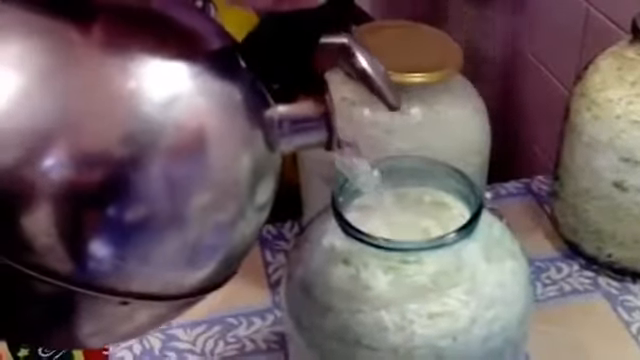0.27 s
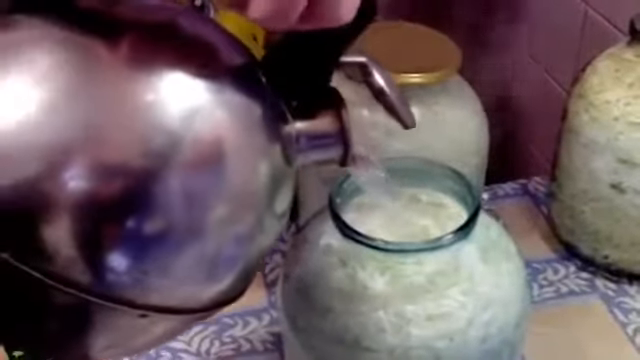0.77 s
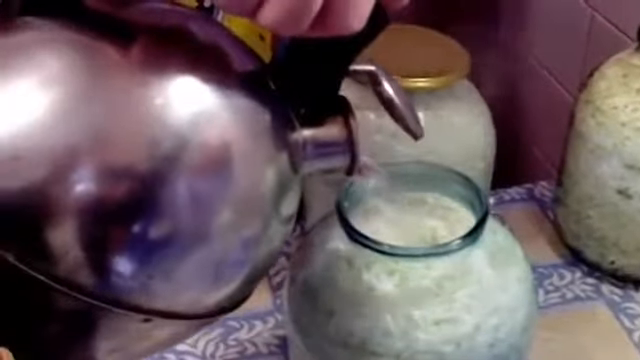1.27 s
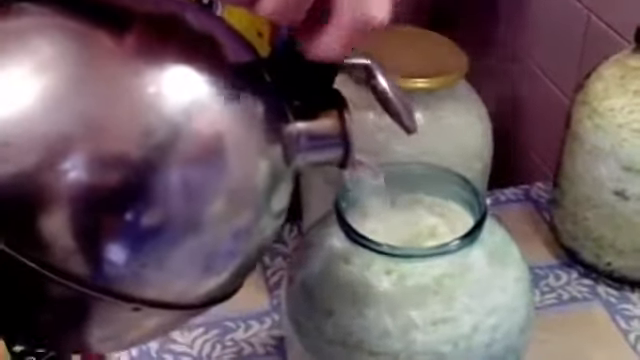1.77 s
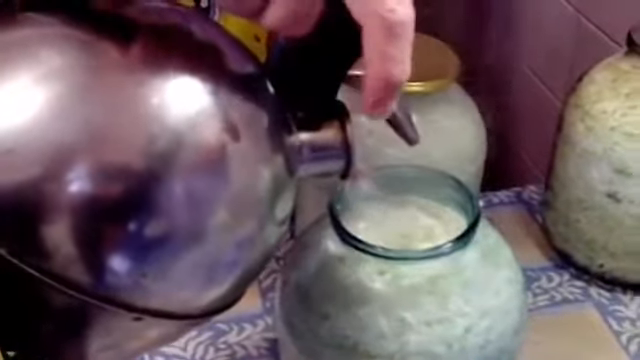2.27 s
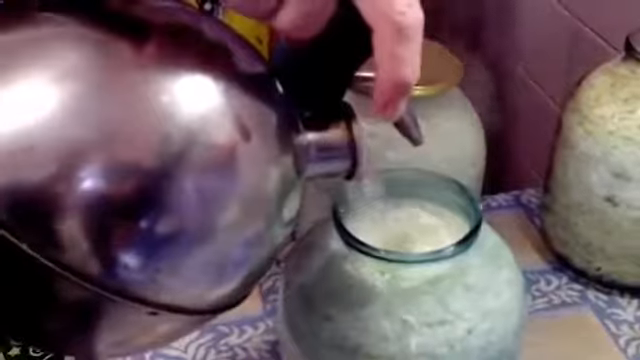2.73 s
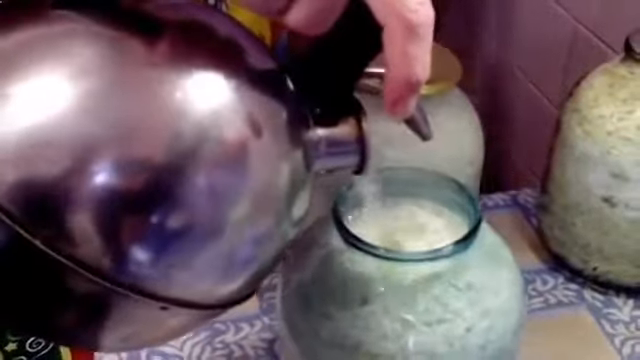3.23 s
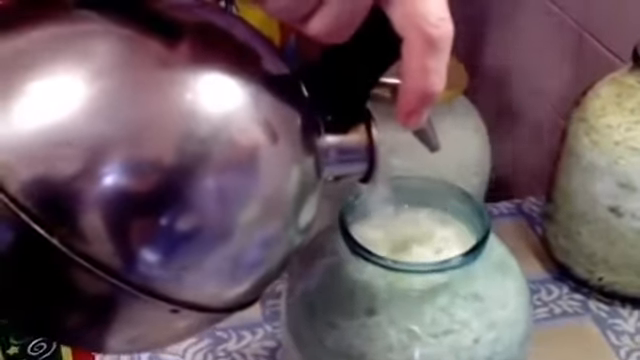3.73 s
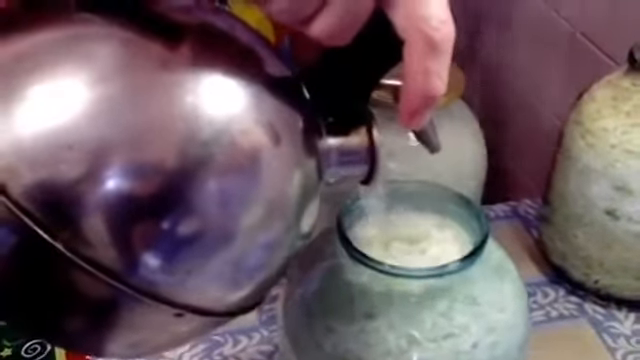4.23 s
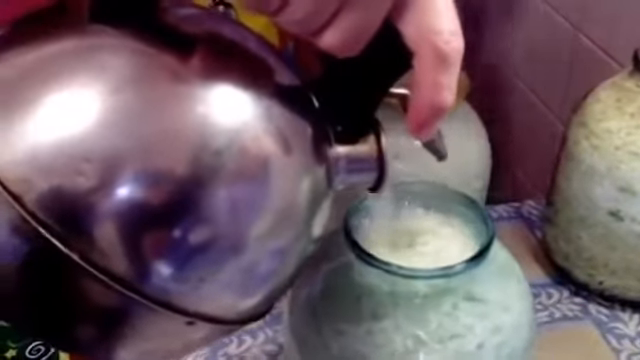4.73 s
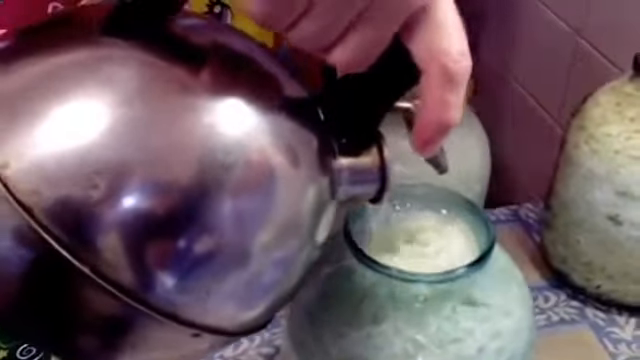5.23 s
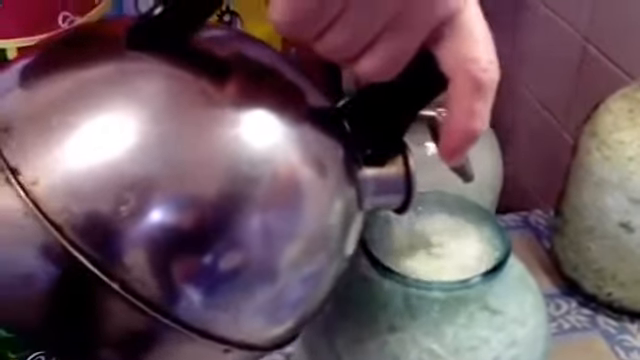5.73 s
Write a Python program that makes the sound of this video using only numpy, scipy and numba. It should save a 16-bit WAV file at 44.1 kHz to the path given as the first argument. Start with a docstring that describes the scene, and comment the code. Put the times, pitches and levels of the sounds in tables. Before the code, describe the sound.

Hot water pours from a kettle into a glass jar stuffed with shredded vegetables, heard very close in a small tiled kitchen. From the start there is a continuous, uneven burble of short bubble tones around 1 kHz, with fine froth crackle and soft low drumming. By 1.7 s the gurgle has climbed to about 1.5 kHz; clear plops and higher glassy blips stand out, with a sharp snap near 1.76 s. From 2 to 4.5 s it is densest: quick surges, tiny interruptions, wet slaps around 3.2-3.35 s, and a deep gulp near 3.9 s. After 4.5 s the stream thins into separate plops, a strong one at 4.67 s, over a growing but faint hiss. A last bright snapping plop with a brief sinking ring comes at 5.88 s. The stereo image leans and flickers, echoes are short, treble is muffled, and gaps sound slightly hollow from noise suppression.

```python
"""Gurgling, plopping and crackling: hot water runs from a kettle into a glass jar of shredded vegetables.
A phone with two microphone ports is close by in a small tiled kitchen, the jar towards its right.
Bubbles are short swelling tones, in random swarms or placed singly; splashes and fine spray are shaped noise.
The jar's air rings as narrow resonances, and decaying noise tails are the tiled walls.
Towards the end the stream thins to separate plops over a quiet hiss."""
import sys
import numpy as np
from scipy import signal
from scipy.fft import rfft, irfft, next_fast_len
from scipy.io import wavfile
from scipy.ndimage import uniform_filter1d
from numba import njit

SR = 44100
rng = np.random.default_rng(int(sys.argv[2]) if len(sys.argv) > 2 else 0)


def to_wav(s):
    """Save 16-bit WAV."""
    ch = np.atleast_2d(s).T  # columns
    pcm = np.round(np.clip(ch, -1, 1) * 32767)  # PCM
    wavfile.write(sys.argv[1], SR, pcm.astype(np.int16))


N = 264548
TIME = np.arange(N) / SR  # seconds
# In every table level_db is relative: later gains, colours and the room still act on it.


def undb(db):
    """Decibels to gain."""
    return 10 ** (np.asarray(db) / 20)


def curve(table, column):
    """One column of a table of (start_s, ..) rows, interpolated at every sample."""
    rows = np.array(table, float)
    return np.interp(TIME, rows[:, 0], rows[:, column])


def shape(points, hz):
    """Gain of (freq_hz, level_db) points on a log-frequency axis."""
    point_hz, level_db = np.transpose(points)
    return undb(np.interp(np.log(hz + 1), np.log(point_hz), level_db))


def filtered(x, response):
    """Pass x through a response given as a function of frequency."""
    size = next_fast_len(N + SR // 4)
    hz = np.arange(size // 2 + 1) * SR / size
    return irfft(rfft(x, size) * response(hz), size)[..., :N]


def colour(x, points):
    """Filter x by a curve of (freq_hz, level_db) points."""
    return filtered(x, lambda hz: shape(points, hz))


def ring(x, modes):
    """Sum of narrow resonances, each excited by x."""
    total = 0
    for hz, width_hz, level_db in modes:
        b, a = signal.iirpeak(hz, hz / width_hz, fs=SR)
        total = total + undb(level_db) * signal.lfilter(b, a, x)
    return total


def steady(x, window_s):
    """Even out the rms over a window, so that single grains still stand out."""
    size = int(window_s * SR)
    power = uniform_filter1d(uniform_filter1d(x ** 2, size), size)
    floor = np.mean(x ** 2) / 100
    return x / np.sqrt(np.abs(power) + floor)


def wander(rate):
    """A random line through unit-spread knots, rate of them a second."""
    knots = np.arange(0, N / SR + 1, 1 / rate)
    return np.interp(TIME, knots, rng.standard_normal(4096)[:len(knots)])


def swells(rows, column, edge_s, arch):
    """Gain that rises and falls in one arch per (start_s, length_s, ..) row, widened by edge_s at both ends."""
    gain = np.zeros(N)
    for row in rows:
        u = (TIME - row[0] + edge_s) / (row[1] + 2 * edge_s)
        inside = (u > 0) & (u < 1)
        gain[inside] += undb(row[column]) * np.sin(np.pi * u[inside]) ** arch  # higher arch: more pointed
    return gain


def bursts(rows):
    """Noise that starts at once and dies away, for rows of (start_s, level_db, decay_ms)."""
    envelope = np.zeros(N)
    for start, db, decay_ms in rows:
        span = slice(int(start * SR), int(start * SR) + SR // 8)
        envelope[span] += undb(db) * np.exp(-1000 * (TIME[span] - start) / decay_ms)
    return envelope * rng.standard_normal(N)


@njit
def tones(start, hz, size, swell, soft, glide):
    """Tones that swell and die away while their pitch creeps; low softness means quick attack and longer tail."""
    out = np.zeros(N)
    for k in range(len(start)):
        first, phase = int(start[k] * SR), 0.
        for i in range(max(0, -first), min(int(8 * swell[k] * SR), N - first)):
            u = i / (swell[k] * SR)  # age in swell times
            v = u / np.sqrt(soft[k] / 2)
            phase += 2 * np.pi * hz[k] * (1 + glide * (u - 1)) / SR
            out[first + i] += size[k] * (v * np.exp(1 - v)) ** soft[k] * np.sin(phase)
    return out


# attack of a bubble by its pitch, quickest near the jar's upper resonance: pitch_hz, softness [exponent]
ATTACK_SOFTNESS = [(1800, 2.08), (2250, 0.29), (2700, 1.1), (3400, 2)]


def bubbles(start, hz, size, swell, glide):
    """Each bubble is one short tone, its attack set by its pitch; glide is its pitch change per swell time."""
    soft = np.maximum(np.interp(hz, *np.transpose(ATTACK_SOFTNESS)), .1)
    return tones(start, hz, size, swell, soft, glide)


CLUSTER_S, CLUSTER_SPREAD = .003, 0.099  # bubbles born together: mean delay, pitch scatter (share)


def swarm(pitch, spread, cycles, scatter_db, glide, count, size=1):
    """Random clusters of like bubbles around a pitch curve: many faint ones and a few strong ones."""
    when, wide, strength = np.repeat(rng.random((count, 3)), size, axis=0).T  # shared by a cluster
    late, life, detune = rng.random((count * size, 3)).T
    start = when * N / SR - CLUSTER_S * np.log(1 - late)
    hz = np.interp(start, TIME, pitch) * np.exp(spread * np.log((wide + .01) / (1.01 - wide)))
    hz = np.minimum(hz * np.exp(CLUSTER_SPREAD * (2 * detune - 1)), SR / 3)
    loudness = undb(-scatter_db * np.log(1 - strength))
    return bubbles(start, hz, loudness, cycles * (.5 + life) / hz, glide)


# resonances of the air in the jar: freq_hz, width_hz, level_db
JAR_MODES = [(700, 180, -2.5), (943, 27, 12), (1260, 82, 6.5), (1338, 50, -1.5), (1400, 31, 8.5),
             (1647, 14, 5.5), (1832, 24, 13), (1884, 92, 6), (2270, 290, 7), (2442, 120, 9),
             (3136, 110, 11), (4420, 530, 7)]


def in_jar(x, ring_db):
    """Sound from the surface, direct and rung by the air in the jar."""
    return x + undb(ring_db) * ring(x, JAR_MODES)


BEADS_FULL_DB, BEADS_THIN_DB = 0.36, 7  # unevenness of the stream at the start and at the end


def beading(rate):
    """The falling stream breaks into beads, more so as it thins, so what it stirs up comes in quick clumps."""
    return undb(np.linspace(BEADS_FULL_DB, BEADS_THIN_DB, N) * wander(rate))


# moments when the stream breaks: start_s, length_s, depth [0-1]
STREAM_LULLS = [(1.26, 0.083, 1), (2.035, 0.041, 0.76), (2.298, 0.029, 0.78), (2.482, 0.2, 0.35),
                (2.761, 0.091, 0.64), (2.924, 0.067, 0.87), (3.04, 0.11, 0.22), (3.314, 0.051, 1),
                (3.62, 0.09, 0.65), (4.102, 0.034, 0.75), (4.243, 0.067, 0.42), (5.06, 0.12, 0.2)]


def unbroken():
    """Share of the even stream that still lands: 1, sinking in each lull."""
    share = np.ones(N)
    for start, length, depth in STREAM_LULLS:
        lull = np.interp((TIME - start) / length, [0, .25, .75, 1], [0, 1, 1, 0])
        share *= 1 - np.clip(depth, 0, 1) * lull
    return share


# the stream wobbles and plunges deeper:
# start_s, length_s (before widening), drumming_level_db, gurgle_level_db, small_bubbles_level_db
STREAM_SURGES = [(.117, 0.03, -52, -38.5, -52), (.25, 0.018, -54.5, -38, -51.5),
                 (.603, 0.037, -53, -36.5, -45), (.799, 0.072, -45, -40.5, -79),
                 (1.05, 0.023, -44, -35, -48), (1.147, 0.052, -51, -37.5, -49.5),
                 (1.24, 0.081, -46, -41.5, -53.5), (1.473, 0.04, -46.5, -52, -49.5),
                 (1.786, 0.1, -46, -36.5, -64), (2.07, 0.23, -42, -40, -50),
                 (2.346, 0.15, -51, -37.5, -48.5), (2.816, 0.045, -43.5, -62, -45.5),
                 (2.89, 0.046, -74, -37.5, -44), (3.01, 0.021, -50, -53, -63),
                 (3.152, 0.044, -41, -50.5, -53), (3.205, 0.12, -40.5, -34, -45),
                 (3.378, 0.053, -43.5, -52.5, -62), (3.529, 0.07, -42.5, -37, -62),
                 (3.71, 0.1, -48.5, -48.5, -43), (3.915, 0.1, -40, -39, -48),
                 (4.19, 0.055, -53, -51, -41.5), (4.35, 0.045, -52.5, -32.5, -41),
                 (4.944, 0.1, -44, -47, -57.5)]
SWAY_PER_S, SWAY_DB = 17, 4.5  # the even stream is never quite even


def stream(even, column, even_db, surge_db):
    """Strength of one voice of the stream: its swaying even part (dB curve) with the surges on top."""
    surge = swells(STREAM_SURGES, column, edge_s=0.012, arch=0.44)
    steady_part = undb(even + even_db + SWAY_DB * wander(SWAY_PER_S)) * unbroken()
    return np.hypot(steady_part, undb(surge_db) * surge)


# the even stream, thinning towards the end: start_s, gurgle_level_db, small_bubbles_level_db, spray_level_db
EVEN_FLOW = [(0.0, -40.5, -50, -51), (0.1, -47.5, -70.5, -57.5), (0.53, -42.5, -54.5, -59.5),
             (0.89, -52, -58.5, -55), (1.1, -45, -53, -49.5), (1.47, -45.5, -60, -60),
             (2.02, -42.5, -48, -53.5), (2.22, -53.5, -53, -58), (2.62, -42.5, -59.5, -54.5),
             (3.11, -48.5, -51, -54), (3.39, -44, -46.5, -55.5), (4.38, -49, -57, -58),
             (5.66, -59, -57.5, -59), (6.0, -70, -77, -63)]
# typical pitch of the gurgle as the pool deepens: start_s, pitch_hz
GURGLE_PITCH_CURVE = [(0, 1036), (.9, 1087), (1.7, 1524), (2.6, 1518), (3.3, 1340), (4.2, 1616), (6, 1566)]
# spectrum of the gurgle: freq_hz, level_db
GURGLE_SPECTRUM = [(200, -37.5), (480, -25), (680, -10), (1000, 6), (1750, 12), (2000, -5.5), (2600, -16),
                   (3200, -53.5)]


def gurgle(beads):
    """The stream folds air into the pool as a burble of middling bubbles; a few ring on as clear, rising blips."""
    pitch = curve(GURGLE_PITCH_CURVE, column=1)
    burble = swarm(pitch, spread=0.1847, cycles=2.5, scatter_db=2.43, glide=0.018, count=3800)
    blips = swarm(pitch, spread=.11, cycles=7, scatter_db=1.2, glide=.015, count=600)
    burble = burble / np.std(burble) + undb(-3) * blips / np.std(blips)
    burble = in_jar(burble * beads, ring_db=0.5)
    strength = stream(curve(EVEN_FLOW, column=1), column=3, even_db=3.5, surge_db=-3.0)
    return steady(colour(burble, GURGLE_SPECTRUM), window_s=0.17) * strength


# spectrum of the low bubbles: freq_hz, level_db
GLUG_SPECTRUM = [(350, -14.5), (520, 0.5), (660, 11), (1200, -26.5)]


def glug(beads):
    """The stream frees large, low bubbles, most of all when a surge digs deep."""
    large = swarm(np.full(N, 780.), spread=0.073, cycles=3.2, scatter_db=4, glide=0.0072, count=2500)
    strength = stream(curve(EVEN_FLOW, column=1), column=2, even_db=-13.0, surge_db=-5.5)
    return steady(colour(large * beads, GLUG_SPECTRUM), window_s=0.15) * strength


def tinkle(beads):
    """Smaller bubbles ring higher."""
    small = swarm(np.full(N, 2450.), spread=.08, cycles=2.2, scatter_db=2.6, glide=.01, count=4000)
    small = in_jar(small * beads, ring_db=0)
    strength = stream(curve(EVEN_FLOW, column=2), column=4, even_db=3.5, surge_db=1.0)
    return steady(small, window_s=1.0) * strength


# spectrum of the fine droplets: freq_hz, level_db
FIZZ_SPECTRUM = [(1500, -20), (3000, 1), (4000, 1.5), (6500, -4), (8000, -31.5)]


def fizz(beads):
    """Countless tiny droplets thrown up with the small bubbles: a fine hiss from all over the jar's mouth."""
    mist = colour(rng.standard_normal((2, N)) * np.sqrt(beads), FIZZ_SPECTRUM)
    strength = stream(curve(EVEN_FLOW, column=2), column=4, even_db=-5.5, surge_db=-7.5)
    return mist / np.std(mist) * strength


# patches of froth bursting: start_s, length_s (before widening), level_db, pitch_hz
FROTH_PATCHES = [(0, 0.0075, -40.5, 5360), (0.125, 0.032, -47, 3464), (0.232, 0.043, -47, 4275),
                 (0.324, 0.05, -45, 4890), (0.393, 0.04, -43.5, 4170), (0.572, 0.041, -49, 4560),
                 (0.68, 0.059, -53.5, 5040), (0.916, 0.067, -48.5, 4620), (1.043, 0.0077, -41, 5770),
                 (1.14, 0.059, -48, 4790), (1.372, 0.041, -45, 5030), (1.485, 0.094, -46.5, 5150),
                 (1.729, 0.025, -43.5, 5130), (1.898, 0.061, -48, 4980), (2.071, 0.074, -56, 4060),
                 (2.16, 0.047, -42, 6360), (2.27, 0.016, -51.5, 3880), (2.446, 0.069, -38.5, 4650),
                 (2.811, 0.11, -53, 4970), (3.028, 0.054, -48, 4690), (3.286, 0.013, -46, 4550),
                 (3.39, 0.034, -44.5, 4290), (3.561, 0.11, -47.5, 4850), (3.756, 0.017, -46, 3530),
                 (3.902, 0.11, -53, 3705), (4.361, 0.021, -42.5, 5850), (4.525, 0.041, -49, 4426)]
# spectrum of the spray: freq_hz, level_db
SPRAY_SPECTRUM = [(1500, -14.5), (2800, -61), (3250, 2.5), (4500, -4.5), (6200, 5), (6900, 2), (7500, -7.5),
                  (8200, -30), (12000, -26.5)]


def spray(beads):
    """Froth bursts in patches, each made of small clusters of tiny bubbles of a like size."""
    s, length, _, hz = np.array(FROTH_PATCHES, float).T
    patch_hz = np.interp(TIME, s + length / 2, hz) * np.exp(.08 * wander(rate=30))
    crackle = swarm(patch_hz, spread=.13, cycles=5.5, scatter_db=3, glide=.004, count=3000, size=4)
    crackle = colour(in_jar(crackle * beads, ring_db=-11.0), SPRAY_SPECTRUM)
    crackle = steady(crackle, window_s=.06)
    patches = swells(FROTH_PATCHES, column=2, edge_s=0.0078, arch=0.071)
    even = undb(curve(EVEN_FLOW, column=3) + 4.5) * unbroken()
    return crackle * np.hypot(even, patches)


# low resonances of the filled jar on the table: freq_hz, width_hz, level_db
BODY_MODES = [(128.5, 13, 15.5), (155.1, 32, 9.5), (180, 24, -4.5), (314, 27, 4.5)]
# spectrum of the drumming: freq_hz, level_db
THRUM_SPECTRUM = [(30, -26.5), (65, -14), (105, -1.5), (210, 9), (320, 8), (450, -12.5), (900, -44.5)]


def drumming():
    """The weight of the stream pats the soaked packing and shakes the jar."""
    pats = swarm(np.full(N, 170.), spread=.35, cycles=.35, scatter_db=1.5, glide=.02, count=2000)
    thrum = steady(colour(ring(pats, BODY_MODES), THRUM_SPECTRUM), window_s=.06)
    return thrum * stream(curve(EVEN_FLOW, column=1), column=2, even_db=-13.0, surge_db=0.34)


# spectrum of the room noise: freq_hz, level_db
HISS_SPECTRUM = [(25, -40.5), (60, -15.5), (130, 14), (200, 3.5), (340, 9.5), (550, 2), (1200, -20),
                 (2500, -17), (3800, -18), (5000, -15), (6800, -19.5), (7500, -27), (7850, -58.5),
                 (15000, -72)]
# level of the room's hiss above the murmur: start_s, level_db
HISS_LEVEL = [(0, -38.5), (2, -65), (3.9, -53), (4.4, -46), (5.2, -41), (6, -40.5)]
MURMUR_DB = -54.5  # gain of the low part, which stays even


def hiss():
    """Quiet room noise, partly shared by the ports: an even low murmur, and a hiss that sinks and grows again."""
    mid, side = colour(rng.standard_normal((2, N)), HISS_SPECTRUM)
    side = colour(side, [(120, -3.0), (400, -3.0), (1200, -2.5)])
    pair = np.array([mid + side, mid - side])
    pair = pair / np.std(pair)
    low = colour(pair, [(200, 0), (330, -3), (700, -3), (1600, -30)])
    return low * undb(MURMUR_DB) + (pair - low) * undb(curve(HISS_LEVEL, column=1))


SHED_DB, SHED_S, SHED_SPREAD = -12, 0.018, 0.18  # highest level against the parent, time window, pitch scatter
SHED_CYCLES = 2.5  # cycles in which a shed bubble swells


def shed(s, hz, db, count):
    """Each big bubble is followed by a few weaker ones of about its size."""
    late, wide, weak = rng.random((len(s), 3, count)).transpose(1, 2, 0)
    pitch = (hz * np.exp(SHED_SPREAD * (2 * wide - 1))).ravel()
    start = (s + SHED_S * late).ravel()
    return bubbles(start, pitch, (undb(db + SHED_DB) * weak).ravel(), SHED_CYCLES / pitch, 0.0099)


# big bubbles: start_s, level_db, pitch_hz, swell [cycles]
BIG_BUBBLES = [(0.1542, -35, 1060, 2.6), (0.346, -33, 1126, 1.5), (0.388, -26, 1140, 1.5),
               (0.433, -24.5, 1060, 1.2), (0.4579, -23.5, 1036, 0.69), (0.506, -40, 1270, 0.31),
               (0.5718, -34.5, 1140, 2.8), (0.618, -20, 1170, 1.2), (0.688, -24.5, 1360, 1.2),
               (0.715, -25, 1324, 1.6), (0.7332, -31, 1290, 2.8), (.852, -32.5, 1330, 3.3),
               (0.894, -29.5, 1290, 1.3), (1.005, -31.5, 1255, 3.2), (1.182, -30, 1530, 1.5),
               (1.251, -25.5, 2420, 3), (1.265, -26, 1310, 0.77), (1.4773, -33.5, 1490, 1.7),
               (1.532, -32.5, 1433, 6.9), (1.74, -24.5, 1390, 1.1), (1.7812, -23, 1410, 1.3),
               (1.822, -24, 1474, 1.9), (1.97, -18.5, 1445, 2), (1.9757, -21.5, 1700, 3),
               (2.0933, -26, 2370, 3.6), (2.113, -25, 2400, 3), (2.1454, -26.5, 1690, 2.1),
               (2.164, -22, 1540, 1.4), (2.236, -18, 1485, 1.7), (2.26, -31, 1645, 3.5),
               (2.3476, -26.5, 1304, 3), (2.3629, -17, 1540, 1.2), (2.578, -30.5, 1600, 3.8),
               (2.686, -26.5, 1550, 2.3), (2.7565, -21.5, 1640, 3.1), (2.864, -27.5, 1790, 2.2),
               (2.902, -21, 1595, 1.4), (2.9388, -24.5, 1635, 2.6), (3.0229, -27.5, 1660, 0.83),
               (3.229, -18, 1580, 0.83), (3.265, -25, 1290, 1.6), (3.262, -23.5, 2430, 2.3),
               (3.323, -17.5, 1323, 1.3), (3.332, -19, 1690, 2.8), (3.2875, -25, 1320, 1.3),
               (3.342, -26, 1640, 3.3), (3.391, -26, 1710, 3.9), (3.406, -25, 1724, 3.8),
               (3.4875, -29.5, 2410, 5.8), (3.4937, -25, 1575, 1.8), (3.602, -27, 1590, 2),
               (3.7297, -23.5, 1167, 0.39), (3.739, -24.5, 1520, 1), (3.777, -32.5, 2460, 4.3),
               (3.798, -31, 1670, 2), (3.912, -18.5, 2190, 0.96), (3.937, -20.5, 1740, 1.9),
               (3.9545, -23, 1750, 1.1), (4.0788, -20.5, 2380, 2.9), (4.155, -31, 2320, 3.9),
               (4.1877, -39, 2450, 1.6), (4.2215, -24, 2240, 1.5), (4.2386, -28.5, 2305, 3.1),
               (4.356, -31, 1600, 1), (4.377, -21, 2320, 3.2), (4.383, -19.5, 1345, 1.5),
               (4.4958, -22, 2376, 2.6), (4.6205, -26, 2970, 0.33), (4.731, -39, 1280, 0.61),
               (4.7713, -41, 2380, 1.9), (4.5296, -19, 2525, 1.8), (4.5619, -25.5, 2320, 3.9),
               (4.667, -15.5, 1458, 2.9), (4.758, -23.5, 2560, 0.61), (4.805, -32, 1770, 4.7),
               (4.859, -33.5, 2400, 2), (4.896, -36, 1230, 2.5), (5.009, -25.5, 1720, 1.3),
               (5.014, -24.5, 2490, 4.4), (5.0226, -22, 2270, 1.2), (5.172, -31, 1650, 3.2),
               (5.2861, -30.5, 1220, 1.2), (5.2917, -29, 1186, 2), (5.4627, -25.5, 2430, 3.1),
               (5.4748, -28, 2340, 1.1), (5.4895, -27.5, 2930, 1.8), (5.75, -29, 1270, 1.7),
               (5.8763, -19.5, 1468, 2.9)]
PLOP_DB = 3.5  # gain of all big bubbles


def plops():
    """Big single bubbles, each with a weaker bounce off the glass and a ring of the jar."""
    s, db, hz, cycles = np.array(BIG_BUBBLES, float).T
    direct = bubbles(s, hz, undb(db + PLOP_DB), cycles / hz, 0.012)
    bounce = np.interp(TIME - .0058, TIME, direct)  # 5.8 ms later
    smaller = shed(s, hz, db + PLOP_DB, count=4)
    return direct + smaller + undb(-23.5) * bounce + undb(-20) * ring(bounce, JAR_MODES)


# large air pockets gulping in the packing: start_s, pitch_hz, level_db, swell_ms
AIR_POCKETS = [(0.256, 168, -41, 12), (0.627, 126, -40, 24), (0.811, 156, -39.5, 12.4),
               (1.271, 164, -39.5, 37), (2.092, 186.8, -34.5, 44), (2.828, 177, -43.5, 7.9),
               (3.156, 186, -37, 6.6), (3.928, 131, -32, 22), (5.006, 123, -42.5, 30),
               (5.925, 655, -49.5, 63)]


def gulps():
    """Air pockets between the shreds give way with a low, unsteady boom."""
    s, hz, db, swell_ms = np.array(AIR_POCKETS, float).T
    return bubbles(s, hz, undb(db), swell_ms / 1000, 0.0077) * undb(1.1 * wander(rate=10))


SPLIT_S, SPLIT_SPREAD = 0.0032, 0.48  # tiny bubbles of one drop: time window, pitch scatter (share)


def splinters(s, hz, db, count):
    """A drop breaks into a handful of tiny bubbles within a few milliseconds."""
    late, wide = rng.random((len(s), 2, count)).transpose(1, 2, 0)
    pitch = (hz * np.exp(SPLIT_SPREAD * (2 * wide - 1))).ravel()
    return bubbles((s + SPLIT_S * late).ravel(), pitch, np.tile(undb(db), count), 2.5 / pitch, .02)


# drops snapping on the surface and the glass: start_s, pitch_hz, level_db
SNAPPING_DROPS = [(0.402, 4000, -34.5), (0.6192, 4850, -20), (0.633, 5500, -28.5), (.664, 3930, -31.5),
                  (0.7049, 5350, -24), (1.061, 4490, -21), (1.0926, 6040, -31.5), (1.25, 4230, -25),
                  (1.385, 4720, -23.5), (1.7646, 5760, -14), (1.8853, 5040, -27), (1.928, 6200, -25),
                  (2.086, 4650, -30.5), (2.1166, 4090, -17.5), (2.1486, 3300, -24), (2.45, 6870, -20.5),
                  (2.47, 4660, -19), (2.8366, 6060, -24), (2.9007, 4600, -20.5), (2.934, 6000, -27),
                  (3.02, 4780, -19), (3.2064, 5680, -15), (3.2919, 4720, -20.5), (3.3473, 4220, -16.5),
                  (3.4165, 4510, -20), (3.501, 3440, -26.5), (3.602, 5500, -33), (3.752, 3360, -31.5),
                  (3.8392, 5270, -31.5), (4.384, 3500, -30.5), (4.55, 5040, -33.5), (5.489, 3360, -48),
                  (5.729, 3530, -32.5), (5.8747, 5080, -14)]
# spectrum of the snaps: freq_hz, level_db
SNAP_SPECTRUM = [(300, -3), (1500, 12), (3000, -0.5), (4500, -1), (6500, 4.5), (7300, -9), (8000, -8.5),
                 (15000, -58.5)]


def snaps():
    """A drop cracks into a tight cluster of bubbles and scatters a short spatter of noise."""
    s, hz, db = np.array(SNAPPING_DROPS, float).T
    crack = bubbles(s, hz, undb(db + 3), 1.58 / hz, 0.01) + splinters(s, hz, db - 14.5, count=6)
    spatter_rows = [(start, level_db, 5) for start, level_db in zip(s, db)]  # 5 ms decay
    spatter = undb(-23.0) * bursts(spatter_rows)
    return colour(crack + in_jar(spatter, ring_db=1), SNAP_SPECTRUM) * undb(-0.5)


# lumps of water slapping the pool: start_s, level_db, decay_ms
WATER_SLAPS = [(.434, -28, 23), (1.762, -24, 14), (2.155, -30, 28), (3.2062, -24.5, 9), (3.229, -32.5, 15),
               (3.2605, -26, 6.1), (3.289, -25.5, 8.7), (3.324, -9.5, 0.18), (3.346, -29.5, 14),
               (3.935, -35, 47), (4.375, -28, 7.6), (4.944, -37, 18), (4.994, -32.5, 22)]
# spectrum of the slaps: freq_hz, level_db
SLAP_SPECTRUM = [(25, -19), (130, -16), (300, -5), (480, -5), (700, 8.5), (1300, 0.5), (2000, 4.5),
                 (2500, -14), (3200, -15), (6500, -8), (7800, -50.5)]


def slaps():
    """A lump of water lands with a short, broad splash."""
    return colour(bursts(WATER_SLAPS), SLAP_SPECTRUM) * undb(4)


# the sharpest cracks also spit in the top octave: start_s, level_db, decay_ms
BRIGHT_SPITS = [(1.062, -69, 15), (1.764, -50.5, 2.2), (2.83, -70, 9), (3.02, -69.5, 21),
                (5.875, -48.5, 1.8)]
# spectrum of the spits: freq_hz, level_db
SPIT_SPECTRUM = [(5000, -50), (8500, 27.5), (10800, 14.5), (12300, 10), (15000, 13)]


def spits():
    """The brightest edge of a crack is heard only on the direct path."""
    return colour(bursts(BRIGHT_SPITS), SPIT_SPECTRUM)


# tones left by the heaviest drops: start_s, pitch_hz, level_db, swell_ms
DROP_RINGS = [(3.323, 1565, -34, 10), (4.676, 1452, -39.5, 5.9), (5.878, 1607, -29.5, 14.4)]
RING_GLIDE = -0.017  # change of pitch per swell time (share)


def rings():
    """A heavy drop leaves a pocket of air that sings on for a moment, its tone sinking as it fades."""
    s, hz, db, swell_ms = np.array(DROP_RINGS, float).T
    return bubbles(s, hz, undb(db), swell_ms / 1000, RING_GLIDE)


def kitchen(x, t60_s, wet_db):
    """Hard surfaces return a dense tail, different at each port."""
    age = TIME[:SR // 2]
    onset = np.clip((age - .0015) / 0.0027, 0, 1)  # first return after 1.5 ms
    tail = rng.standard_normal((2, len(age))) * undb(-60 * age / t60_s) * onset
    tail /= np.sqrt(np.sum(tail ** 2, axis=1, keepdims=True))
    return undb(wet_db) * signal.fftconvolve(x[None], tail, axes=1)[:, :N]


PORT_LAG_MS = 0.26


def ports(x):
    """The jar stands to the right, so its sound reaches the left port a little later."""
    left = filtered(x, lambda hz: np.exp(-2j * np.pi * hz * PORT_LAG_MS / 1000))
    return np.array([left, x])


DRIFT_PER_S, DRIFT_DB = 32, 5.5  # rate and spread of the wandering balance


def drift(pair):
    """The stream lands now a little to the left, now to the right."""
    lean = undb(DRIFT_DB * wander(DRIFT_PER_S))
    return pair * np.array([lean, np.ones(N)]) * np.sqrt(2 / (1 + lean ** 2))


# left minus right at the two microphone ports: freq_hz, difference_db
PORT_BALANCE = [(150, 1), (450, -0.5), (760, 1), (950, -5.5), (1170, -13), (1420, 14.5), (1680, -4),
                (1950, 13.5), (2400, -21), (3400, -17.5), (4400, -8), (6200, -13.5), (9000, -28.5)]


def shade(pair):
    """The phone's body shares the power unevenly between the ports, band by band."""
    def share(hz):
        ratio = shape(PORT_BALANCE, hz)
        return np.array([ratio, np.ones_like(ratio)]) * np.sqrt(2 / (1 + ratio ** 2))
    return filtered(pair, share)


# brief drop-outs of the low tones: start_s, length_s, centre_hz
LOW_DIPS = [(0.396, 0.083, 166), (0.418, 0.1, 326), (0.711, 0.079, 464), (1.096, 0.15, 380),
            (1.397, 0.035, 445), (1.835, 0.045, 640), (1.985, 0.049, 450), (2.13, 0.11, 434),
            (2.267, 0.043, 460), (2.469, 0.077, 437), (2.488, 0.1, 690), (2.923, 0.077, 277),
            (3.296, 0.098, 146), (3.406, 0.12, 360), (3.641, 0.021, 600), (3.769, 0.051, 510),
            (3.962, 0.062, 403), (4.08, 0.015, 720), (4.22, 0.044, 523), (4.549, 0.06, 774),
            (5.051, 0.028, 704)]
DIP_DB, DIP_SPREAD = -23, 0.46  # depth of a dip, and its half width in natural-log frequency


def dips(pair):
    """Low tones drop out briefly, each around its own frequency."""
    hz, s, frames = signal.stft(pair, SR, nperseg=1024, noverlap=768)
    dip = 0
    for start, length, centre in LOW_DIPS:
        across = np.exp(-(np.log((hz + 1) / centre) / DIP_SPREAD) ** 4)
        along = np.exp(-(2 * (s - start) / length - 1) ** 4)
        dip = np.maximum(dip, np.outer(across, along))
    return signal.istft(frames * undb(DIP_DB * dip), SR, nperseg=1024, noverlap=768)[1][:, :N]


# slight lift of the splashing around 2050 Hz: freq_hz, level_db
SPLASH_TILT = [(1900, 0), (2050, 1.5), (2220, -0.5)]
# the splashing drops steeply in the treble: freq_hz, level_db
TREBLE_MUFFLE = [(7400, 0), (8000, -12)]


def scene():
    """Water and jar in the kitchen, over the room's hiss."""
    beads = beading(rate=110)
    burble = colour(gurgle(beads) + glug(beads) + slaps(), SPLASH_TILT)
    crackle = colour(tinkle(beads), SPLASH_TILT) + spray(beads)
    big, cracks = plops() + rings(), snaps()
    pool, froth = burble + big, crackle + cracks
    thrum = drumming() + gulps()
    # the stream wanders about, while a single bubble or drop sounds from one spot
    direct = drift(ports(burble + crackle)) + ports(big + cracks + thrum)
    # the jar's mouth beams the treble at the kettle and the tiles, which throw it straight back
    near = kitchen(froth, t60_s=0.046, wet_db=-4.5) + kitchen(pool, t60_s=0.052, wet_db=-10.0)
    far = kitchen(pool + froth, t60_s=0.16, wet_db=-14.0)
    boom = kitchen(thrum, t60_s=0.41, wet_db=-12.5)
    # splashing that comes back from all round the room reaches both ports equally strongly
    around = kitchen(froth, t60_s=0.1, wet_db=-18) + fizz(beads)
    water = colour(shade(direct + near + far + boom) + around, TREBLE_MUFFLE)
    return dips(water + shade(ports(spits())) + hiss())


# level under which the phone's noise suppressor turns a band down: freq_hz, level_db
SUPPRESS_BELOW = [(60, -97.5), (150, -94.5), (300, -63), (480, -62.5), (800, -72.5), (1900, -71),
                  (3000, -68), (5000, -70), (8000, -82.5)]
SUPPRESS_DB = -14.5  # the most that it takes away


def suppress(pair):
    """Each band is turned down while it holds little sound, which hollows out the gaps between gurgles."""
    hz, _, frames = signal.stft(pair, SR, nperseg=1024, noverlap=768)
    power = np.mean(np.abs(frames) ** 2, axis=0)
    power = np.abs(uniform_filter1d(uniform_filter1d(power, size=5, axis=0), size=7, axis=1))
    threshold = shape(SUPPRESS_BELOW, hz)[:, None] ** 2
    gain = np.maximum(power / np.hypot(power, threshold), undb(SUPPRESS_DB))
    return signal.istft(frames * gain, SR, nperseg=1024, noverlap=768)[1][:, :N]


TOP_HZ = 15500


def record(dry):
    """The phone suppresses faint noise and cuts the top."""
    low_pass = signal.ellip(8, .2, 70, TOP_HZ, fs=SR, output="sos")
    return signal.sosfilt(low_pass, suppress(dry))


dry = scene()
out = record(dry)
to_wav(out)
```